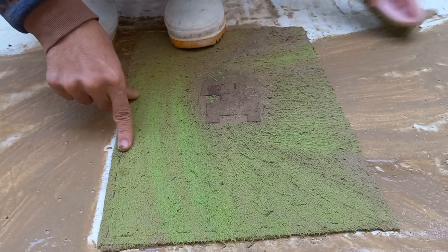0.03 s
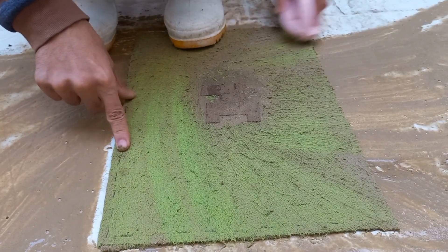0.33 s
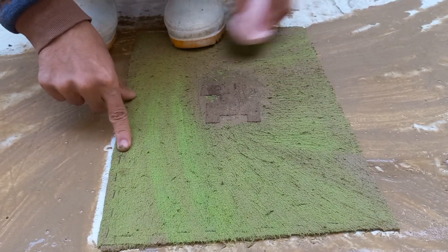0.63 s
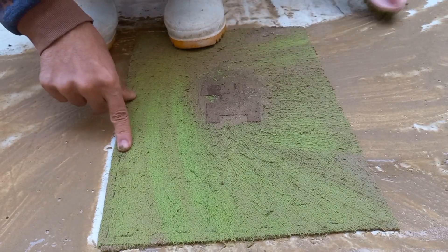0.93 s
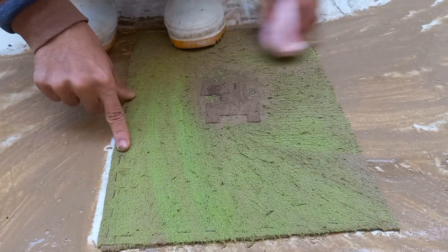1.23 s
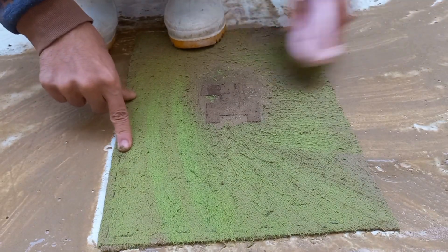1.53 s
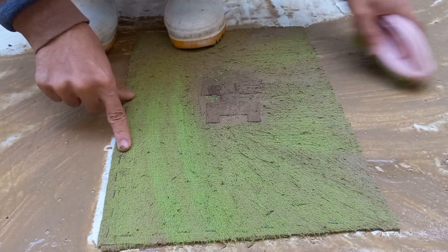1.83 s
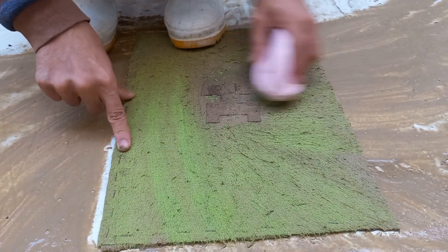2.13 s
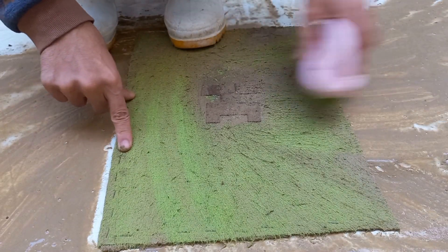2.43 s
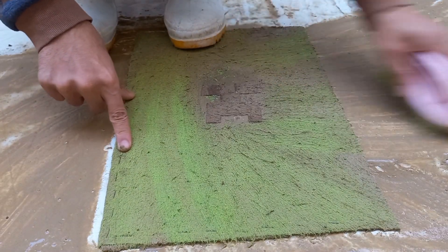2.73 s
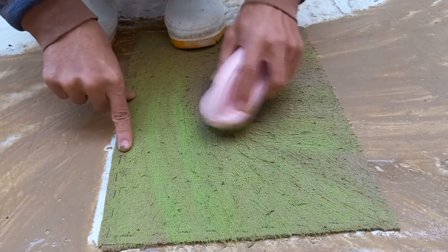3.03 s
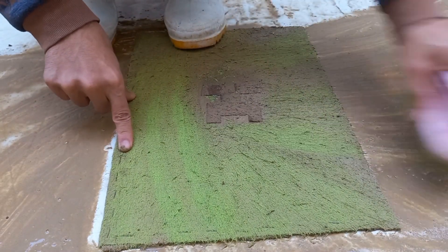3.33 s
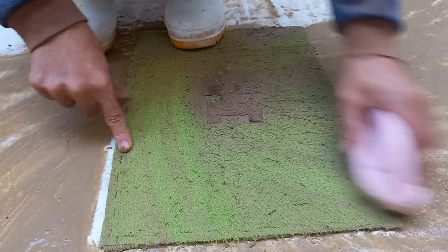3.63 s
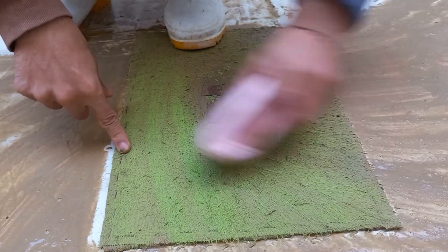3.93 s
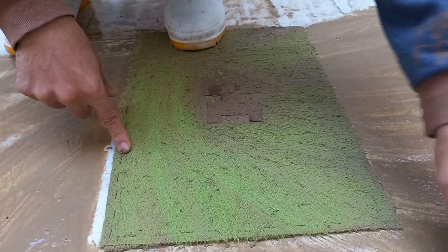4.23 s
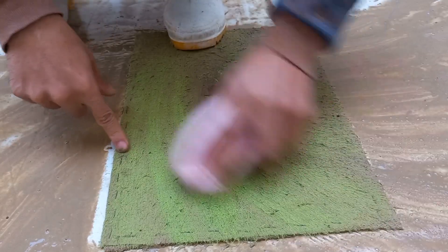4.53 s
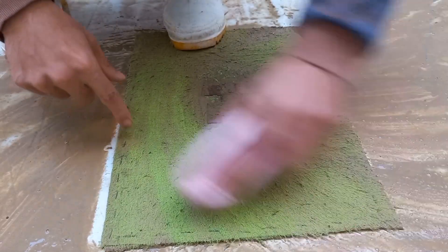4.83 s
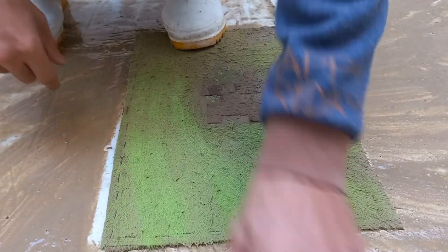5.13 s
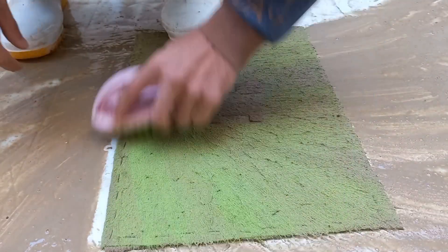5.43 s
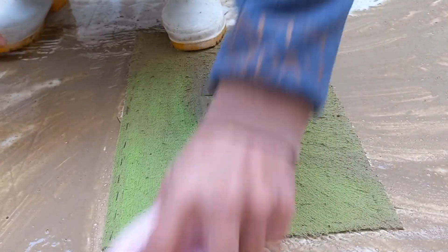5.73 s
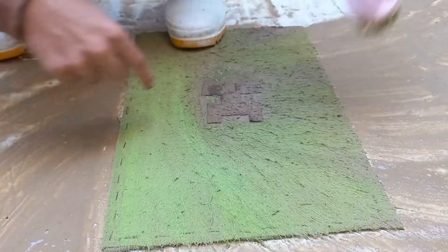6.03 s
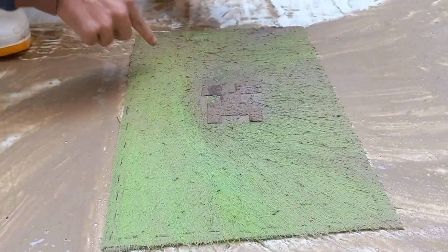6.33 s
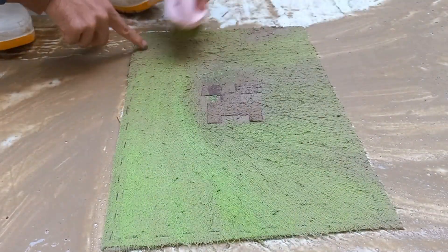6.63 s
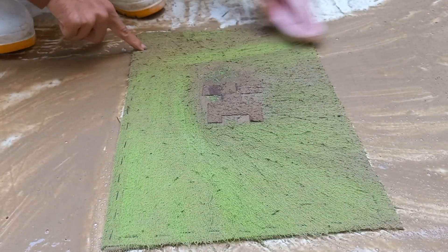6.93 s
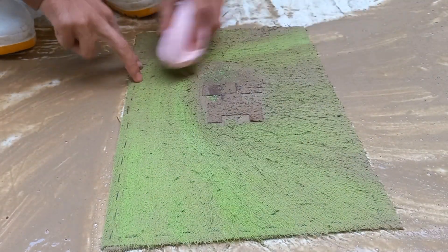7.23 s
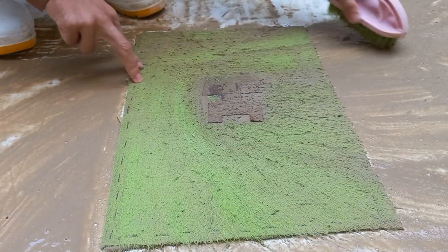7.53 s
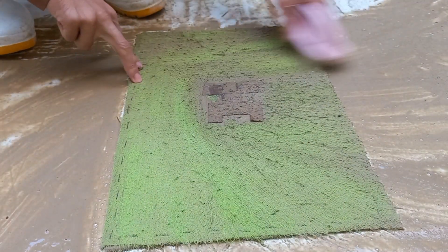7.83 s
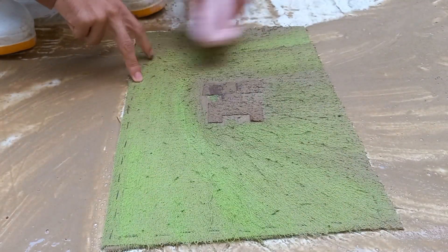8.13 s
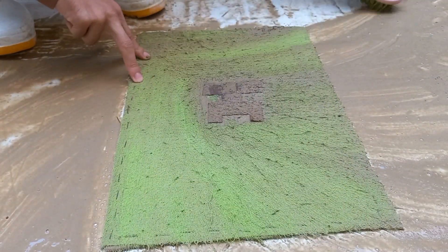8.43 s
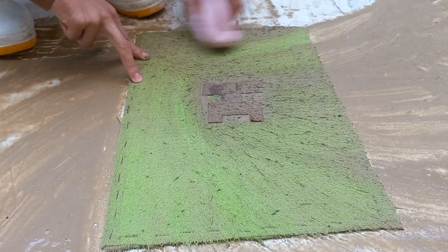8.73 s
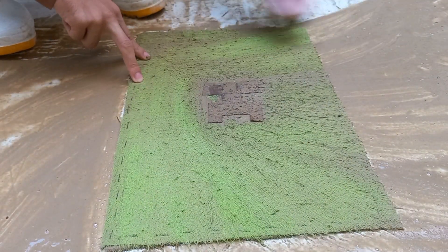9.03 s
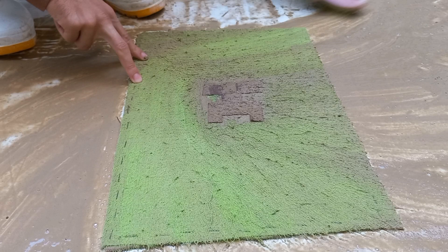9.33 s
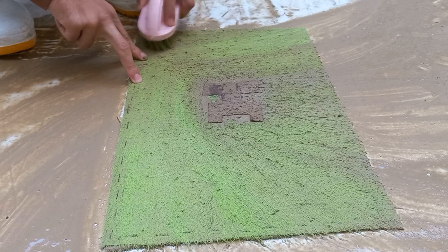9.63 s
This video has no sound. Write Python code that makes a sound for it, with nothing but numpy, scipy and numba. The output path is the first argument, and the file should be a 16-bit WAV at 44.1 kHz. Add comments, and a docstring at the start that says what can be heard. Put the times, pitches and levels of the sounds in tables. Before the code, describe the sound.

Short, bright swishes repeat at an even pace as stiff bristles are pushed across a soaked, muddy carpet, with a gritty rasp and a few flung drops. The strokes grow a little louder, stop for about a second while a boot shuffles and lands with a dull thud, then carry on as before. The stereo microphone is close, in a small hard room with a quiet low rumble.

```python
"""In a small hard room, a stiff hand brush sweeps again and again across a wet, muddy rug on the floor.
Friction is a train of tiny impulses: tips hiss through the pile, bent shafts stick and slip, mud grinds.
Each stroke travels from left to right past a close stereo microphone, and drops tick as damped
resonances. The worker's boots scuff now and then, and in a pause one is set down with a thud.
A low rumble with soft bumps, a hum, a faint drone and airy noise lie underneath."""
import sys
import numpy as np
from scipy import signal
from scipy.fft import rfft, irfft, next_fast_len
from scipy.io import wavfile
from scipy.ndimage import map_coordinates
from numba import njit

SR = 44100
rng = np.random.default_rng(int(sys.argv[2]) if len(sys.argv) > 2 else 0)


def file_out(sig):
    """Save sig as 16-bit WAV at sys.argv[1]."""
    # one column per channel
    cols = np.atleast_2d(sig).T
    # limit, then scale
    lim = np.clip(cols, -1, 1)
    pcm = np.round(lim * 32767).astype(np.int16)
    wavfile.write(sys.argv[1], SR, pcm)


N = 426447
TIME = np.arange(N) / SR


def undb(db):
    """Logarithmic level: 20 dB is a tenfold amplitude."""
    return 10 ** (np.asarray(db) / 20)


def unit(x):
    """Normalisation to rms 1."""
    return x / np.sqrt(np.mean(x ** 2) + 1e-18)


def colour(x, spectrum, tilt_db=0):
    """Spectral shaping by (f/Hz, level/dB) points, tilted by tilt_db per octave; rms 1."""
    size = next_fast_len(x.shape[-1])
    octave = np.log2(np.maximum(np.fft.rfftfreq(size, 1 / SR), 1))
    hz, db = np.transpose(spectrum)
    gain = undb(np.interp(octave, np.log2(hz), db) + tilt_db * np.maximum(octave, np.log2(hz[0])))
    return unit(irfft(rfft(x, size) * gain, size)[..., :x.shape[-1]])


@njit
def resonate(x, hz, width_hz):
    """Second-order resonance: a state-variable band-pass with gain 1 at its moving centre."""
    y, band, low = np.empty(len(x)), 0., 0.
    for i in range(len(x)):
        g = np.tan(np.pi * min(hz[i], .45 * SR) / SR)
        damping = width_hz / hz[i]
        v = (band + g * (x[i] - low)) / (1 + g * (g + damping))
        band, low = 2 * v - band, low + 2 * g * v
        y[i] = damping * v
    return y


def resonate_twice(x, hz, width_hz):
    """Two equal resonances in cascade give steeper skirts."""
    centre = np.full(len(x), hz, dtype=float)
    return resonate(resonate(x, centre, float(width_hz)), centre, float(width_hz))


def walk(size, rate):
    """Random modulation: lines joining Gaussian values, rate of them a second."""
    place = np.arange(size) * rate / SR
    knots = rng.standard_normal(int(place[-1]) + 2)
    return np.interp(place, np.arange(len(knots)), knots)


def flicks(size, rate, spread_db):
    """Shot noise: random impulses of scattered strength, rate of them a second; rms 1."""
    strength = undb(spread_db * np.clip(rng.standard_normal(size), -2.5, 2.5))
    return unit((rng.random(size) < rate / SR) * rng.choice([-1, 1], size) * strength)


def ports(x, lag_ms, late_ms=0):
    """Time of arrival: x reaches two microphone ports late_ms later, the left lag_ms after the right."""
    index = np.arange(len(x))
    delays = [(late_ms + side * lag_ms / 2) * SR / 1000 for side in (1, -1)]
    return np.array([map_coordinates(x, [index - delay], order=3) for delay in delays])


def wide_noise(size, side):
    """Partial coherence: stereo noise with a given side-to-mid ratio."""
    common, apart = rng.standard_normal((2, size))
    return np.array([common + side * apart, common - side * apart])


def add(out, start_s, x):
    """Superposition of x on out from start_s; what lies outside the scene is dropped."""
    i = int(start_s * SR)
    x, i = x[..., max(-i, 0):], max(i, 0)
    out[:, i:i + x.shape[-1]] += x[..., :max(N - i, 0)]


# Spectrum of the bristle tips: f/Hz, level/dB
TIP_SPECTRUM = [(1500, -43), (3000, -15), (4700, -3), (6300, -2), (8000, -1), (9800, 0.3), (12500, -1),
                (16000, -3)]

def tip_hiss(size):
    """Shot noise: tips flick through the pile so often that the impulses merge."""
    return colour(flicks(size, rate=5000, spread_db=2.5), TIP_SPECTRUM)


# Spectrum of the slipping shafts: f/Hz, level/dB
SHAFT_SPECTRUM = [(1100, -21.5), (1700, -22), (2100, -1.5), (2500, -2.5), (3300, -2.5), (4500, 1.5),
                  (6000, -2), (10000, -13.5)]

def shaft_rasp(size):
    """Stick-slip friction excites the shafts, whose resonance wanders as they bend."""
    slips = colour(flicks(size, rate=1600, spread_db=0.5), SHAFT_SPECTRUM)
    ring_hz = 3100 * np.exp(0.24 * walk(size, rate=16.1))
    return unit(slips + 2.43 * resonate(slips, ring_hz, width_hz=260.))


# Spectrum of the grinding mud: f/Hz, level/dB
MUD_SPECTRUM = [(650, -33.5), (1100, -2.5), (1450, 3.5), (1750, 9), (2100, 3), (2900, -33)]

def mud_grind(size):
    """Cavity resonance: wet pockets between the bristles ring, rising in pitch as the brush lifts."""
    mud = colour(flicks(size, rate=1300, spread_db=3), MUD_SPECTRUM)
    pocket_hz = np.linspace(1250, 2000, size) * np.exp(0.27 * walk(size, rate=20.1))
    return unit(mud + 1.6 * resonate(mud, pocket_hz, width_hz=170.))


# Spectrum of the rug's backing: f/Hz, level/dB
BACKING_SPECTRUM = [(150, -19), (320, -9), (520, -5.5), (850, -4.5), (1100, -4.5), (1600, -10.5),
                    (3000, -22.5)]

def backing_drag(size):
    """Forced vibration: random tugs draw a dull noise from the backing."""
    return colour(flicks(size, rate=1000, spread_db=4), BACKING_SPECTRUM)


def tuft(hiss_db, rasp_db, grind_db, drag_db):
    """Common modulation: four friction noises waver together as one tuft snags and lets go."""
    size = len(hiss_db)
    friction = (undb(hiss_db) * tip_hiss(size) + undb(rasp_db - 0.86) * shaft_rasp(size)
                + undb(grind_db) * mud_grind(size) + undb(drag_db) * backing_drag(size))
    return undb(0.73 * walk(size, rate=66.6)) * friction


LIFT_S = 0.14  # lifting off fades a stroke by 60 dB in this time

def stroke_levels(t, settle_s, press_s, fast_s, lift_s, hiss_db, rasp_db, grind_db, drag_db, surge_db):
    """Friction noise grows with load and speed: four levels in dB, t seconds after landing."""
    first_touch = 12 * np.minimum(t / settle_s, 0)  # a few bristles arrive before the rest
    settling = -19 * np.exp(-np.maximum(t / settle_s, 0))
    lifting = -60 * (np.maximum(t - lift_s, 0) / LIFT_S) ** 1.24
    uneven_pile = 1.33 * walk(len(t), rate=30.3)
    uneven_mud = 3.5 * walk(len(t), rate=43.4)
    contact = first_touch + settling + lifting + uneven_pile
    push = np.exp(-((t - press_s) / 0.049) ** 2)
    surge = surge_db * np.exp(-((t - fast_s) / 0.029) ** 2)
    backing_release = -155 * np.maximum(t - press_s, 0)
    return (contact + hiss_db + surge,
            contact + rasp_db + 4 * push + 0.46 * surge,
            contact + grind_db + 6 * push + uneven_mud,
            contact + drag_db + 6 * push + uneven_mud + backing_release)


def stroke_lag(t, first_ms, last_ms, travel_s=0.267):
    """Half a cycle of harmonic motion: the lag between the ports follows the hand along its path."""
    progress = (1 - np.cos(np.pi * np.clip(t / travel_s, 0, 1))) / 2
    return first_ms + (last_ms - first_ms) * progress


# The loudest zips of wet bristles, at their peaks: t/s, f/Hz, level/dB
LOUD_ZIPS = [(1.492, 3580, -24.5), (2.891, 3160, -29.5), (3.872, 2480, -29), (4.316, 2350, -20),
             (4.83, 2480, -23), (7.665, 2680, -26.5), (8.075, 3740, -26), (9.511, 3740, -26)]

def zips(t, fastest_s, half_length_s=0.031, octaves_per_s=-2.0):
    """Synchronised stick-slip: bristles briefly slip in step, giving a narrow, falling band."""
    out = np.zeros(len(t))
    when, high = np.clip(rng.standard_normal(2), -2, 2)
    faint_zip = (fastest_s + 0.031 * when, 2800 * 2 ** (0.3 * high), -30.5)  # one in every stroke
    for s, hz, db in [*LOUD_ZIPS, faint_zip]:
        if t[0] < s < t[-1]:
            pitch = hz * 2 ** (octaves_per_s * (t - s))
            ring = resonate_twice(flicks(len(t), rate=4000, spread_db=2), pitch, width_hz=480)
            out += undb(db) * np.exp(-((t - s) / half_length_s) ** 2) * unit(ring)
    return out


def brush_body(sound, t, fast_s, hollow_depth=0.38, ridge_db=-11, sing_db=-5):
    """Antiresonance and resonance: the gap to the rug cuts a climbing hollow; the bristle row sings."""
    hollow_hz = 970 * 2 ** (7.7 * (t - fast_s))
    sing_hz = 4200 * np.exp(0.3 * walk(len(t), rate=17.8))
    grown = np.clip(t / fast_s, 0, 1) ** 2
    return np.array([x - grown * hollow_depth * resonate(x, hollow_hz, width_hz=790.)
                     + grown * undb(ridge_db) * resonate(x, hollow_hz + 844, width_hz=400.)
                     + undb(sing_db) * resonate(x, sing_hz, width_hz=280.) for x in sound])


# Hand position, as the lag of the left port: t/s, lag at stroke start/ms, lag at stroke end/ms
HAND_PATH = [(0, -0.067, 0.15), (1, -0.057, 0.12), (3.2, -.087, 0.28), (4.202, -0.12, 0.23),
             (4.7, -0.14, .17), (5.15, -.18, -0.034), (5.6, -0.19, -0.16), (7, -0.14, 0.12),
             (7.95, -0.099, 0.16), (9.4, -.12, 0.13)]
# Strokes: landing t/s, settling time constant/s; from landing, hardest push t/s, top speed t/s, lift t/s;
# base level/dB of hiss, rasp, grind and drag; hiss surge at top speed/dB
BRUSH_STROKES = [(-0.035, 0.013, 0.1, 0.13, 0.19, -24.5, -28.5, -44, -46.5, 3.3),
                 (0.414, 0.016, 0.13, 0.14, 0.2, -27.0, -30, -44, -45, 4),
                 (0.879, 0.011, 0.092, 0.1, 0.19, -25.0, -29, -41.5, -43.5, 4.5),
                 (1.351, 0.018, 0.088, 0.13, 0.18, -23.5, -27.0, -42, -44.5, 5.3),
                 (1.839, 0.014, 0.1, 0.14, 0.19, -26, -28.5, -45.5, -45.5, 8),
                 (2.286, 0.014, 0.084, 0.14, 0.17, -24, -28, -43.5, -46.5, 7),
                 (2.76, 0.012, 0.088, 0.15, 0.178, -22, -26.0, -40.5, -43.5, 4.6),
                 (3.229, 0.016, 0.064, 0.13, 0.18, -22.0, -23.5, -37.5, -44.0, 3.8),
                 (3.702, 0.012, 0.098, 0.17, 0.21, -22.5, -25.5, -35.0, -44, 4.6),
                 (4.204, 0.015, 0.11, 0.12, 0.19, -21.0, -24.5, -34.5, -43.5, 2.4),
                 (4.681, 0.022, 0.1, 0.13, 0.17, -19.5, -23, -32, -41.5, 1.9),
                 (5.149, 0.012, 0.1, 0.15, 0.187, -22.0, -25.5, -35.5, -42, 3),
                 (5.615, 0.012, 0.092, 0.13, 0.18, -19, -25, -39.5, -41.5, 1.2),
                 (7.018, 0.023, 0.12, 0.15, 0.18, -20.5, -22.5, -37.5, -39.5, 1.1),
                 (7.491, 0.026, 0.12, 0.16, 0.2, -22.5, -25, -42, -43, 3.6),
                 (7.945, 0.023, 0.069, 0.11, 0.17, -20, -25.5, -40.5, -40.5, 2.7),
                 (8.428, 0.017, 0.11, 0.13, 0.19, -22.0, -25.0, -40.5, -42.0, 1.9),
                 (8.908, 0.016, 0.096, 0.14, 0.18, -23.5, -26, -42.5, -47.5, 4.1),
                 (9.372, 0.015, 0.1, 0.145, 0.19, -23.5, -26.5, -42.0, -49.5, 7.3)]

def brush(tufts=4, end_delay_ms=0.11, bounce_db=-4, lead_s=0.04):
    """A moving line source: tufts interfere with their reflections off hand, arm and floor."""
    out = np.zeros((2, N))
    when, *ends = np.transpose(HAND_PATH)
    for s, settle_s, press_s, fast_s, lift_s, *levels in BRUSH_STROKES:
        t = np.arange(-lead_s, lift_s + LIFT_S, 1 / SR)
        envelopes_db = stroke_levels(t, settle_s, press_s, fast_s, lift_s, *levels)
        lag_ms = stroke_lag(t, *(np.interp(s, when, end) for end in ends))
        sound = ports(zips(s + t, s + fast_s), lag_ms)
        for place in np.linspace(-1, 1, tufts):
            source = tuft(*envelopes_db) / np.sqrt(tufts)
            # the detour changes as the arm moves, sweeping a comb filter
            detour_ms = np.linspace(*rng.uniform(0.501, 2.2, 2), len(t))
            bounce = ports(source, lag_ms + 0.18 * place, detour_ms)
            sound += ports(source, lag_ms + end_delay_ms * place ** 3) + undb(bounce_db) * bounce
        add(out, s - lead_s, brush_body(sound, t, fast_s))
    return out


# Spectrum of the background noise: f/Hz, level/dB
AMBIENT_SPECTRUM = [(15, -33), (25, -25), (48, -17.5), (62, -5.5), (90, -1.5), (140, -4), (175, -12.5),
                    (240, -17), (320, -16.5), (480, -16.5), (800, -23.5), (1300, -27.5), (3000, -34),
                    (6500, -37), (16000, -38)]
# Swell of the rumble: t/s, relative level/dB
RUMBLE_SWELL = [(0.0, -26.5), (0.08, -23), (0.21, -40), (3.01, -42.5), (5.47, -42.5), (5.55, -36.5),
                (5.66, -43.5), (5.74, -37.5), (6.14, -44), (6.19, -33), (6.25, -46), (6.54, -34.5),
                (6.89, -46.5), (7.19, -27.5), (7.43, -42.5), (7.94, -37.5), (8.08, -41.5), (9.67, -46)]

def rumble_and_air(split_hz=230, air_db=-51):
    """Amplitude-modulated noise: a rumble swells below the crossover and air wavers above it."""
    lows, highs = (signal.butter(4, split_hz, kind, fs=SR, output="sos") for kind in ("low", "high"))
    rumble = signal.sosfilt(lows, colour(wide_noise(N, side=0.8), AMBIENT_SPECTRUM))
    air = signal.sosfilt(highs, colour(wide_noise(N, side=0.86), AMBIENT_SPECTRUM))
    rumble_db = np.interp(TIME, *np.transpose(RUMBLE_SWELL)) + 2 + 3 * walk(N, rate=12)
    return unit(rumble) * undb(rumble_db) + unit(air) * undb(air_db + 2.1 * walk(N, rate=7))


# Envelope of the drone: t/s, level/dB
DRONE_LEVELS = [(0, -57), (2, -52.5), (2.8, -50.5), (4, -49), (4.6, -54.5), (7.001, -62.5), (9.67, -54.5)]

def drone():
    """Coloured noise: a spectral peak near 290 Hz is heard as a faint drone."""
    spectrum = [(200, -36), (290, -4), (335, -9), (430, -13.5), (900, -24.5), (4000, -78)]
    level_db = np.interp(TIME, *np.transpose(DRONE_LEVELS))
    return colour(wide_noise(N, side=0.091), spectrum) * undb(level_db)


# Envelope of the hum: t/s, level/dB
HUM_LEVELS = [(0, -55), (1.7, -51.5), (2.4, -40), (3.4, -42.5), (4.2, -57), (9.67, -55)]

def hum():
    """Narrow-band noise: neighbouring frequencies beat, making an unsteady low hum."""
    band = np.array([resonate_twice(x, hz=141.4, width_hz=28.5) for x in wide_noise(N, side=0.31)])
    return unit(band) * undb(np.interp(TIME, *np.transpose(HUM_LEVELS)))


# Spectrum of a scuffing sole: f/Hz, level/dB
SOLE_SPECTRUM = [(100, -4.5), (300, 17.5), (500, 4.5), (900, -6.5), (1500, -14), (3500, -25.5),
                 (8000, -40.5), (16000, -52)]
# Boots, knees and sleeves shifting: centre t/s, duration/s, level/dB, tilt/(dB per octave)
SCUFFS = [(0.07, 0.17, -29, -18), (0.715, 0.13, -61, 5), (0.837, 0.15, -48, 6), (3.965, 0.15, -34, 5.5),
          (4.028, 0.16, -42, 6), (5.874, 0.17, -37.5, 4), (6.19, 0.19, -36.5, 6.5), (6.252, .28, -43, 6.5),
          (6.449, 0.55, -53.5, 6.5), (6.695, 0.047, -35, 1), (6.697, 0.22, -54, 11.5),
          (7.283, 0.25, -43, -9)]

def scuffs():
    """Sliding friction: rubber soles rub over grit and water in short swells of noise."""
    out = np.zeros((2, N))
    for s, length_s, db, tilt_db in SCUFFS:
        size = int(length_s * SR)
        grit = 0.5 * flicks(size, rate=2000, spread_db=3) + wide_noise(size, side=0.7)
        grit *= undb(1.8 * walk(size, rate=45))
        add(out, s - length_s / 2, undb(db) * np.hanning(size) * colour(grit, SOLE_SPECTRUM, tilt_db))
    return out


def splash(db, hz, width_hz, t60):
    """Exponential decay of a noise band; higher splashes differ more between the ports."""
    t = TIME[:SR // 6]
    spray = wide_noise(len(t), side=min(hz / 4000, 1))
    burst = np.array([resonate_twice(x, hz, width_hz) for x in spray])
    rise = np.minimum(t / (0.056 * t60), 1)  # longer splashes also start more slowly
    return unit(burst) * rise * undb(db - 60 * t / t60)


# Wet bristles touching the rug just before a stroke: t/s, level/dB
BRISTLE_TOUCHES = [(.390, -37.5), (.838, -39), (1.331, -37), (1.826, -43), (2.271, -44), (4.178, -39),
                   (4.642, -34.5), (5.127, -38.5), (5.596, -29.5), (7.451, -25.5), (7.907, -31.5),
                   (8.393, -38), (9.345, -37)]
# Flung drops and small splashes: t/s, level/dB, f/Hz, bandwidth/Hz, T60/s
FLUNG_DROPS = [(.389, -37.5, 1262, 900, 0.039), (0.77, -31.5, 1850, 1200, 0.11),
               (0.773, -36, 2830, 2600, 0.018), (1.334, -34, 640, 400, 0.091),
               (5.596, -23.5, 1390, 900, 0.031), (6.093, -31, 3260, 1810, 0.075),
               (6.61, -22, 12100, 7140, 0.023), (7.4454, -18, 7140, 14000, 0.019),
               (8.8034, -41, 4490, 5000, 0.024), (9.262, -41, 6500, 2500, .028)]

def wet_ticks():
    """Impact noise: bristles touch down in broadband ticks, drops land in narrower ones."""
    out = np.zeros((2, N))
    for s, db in BRISTLE_TOUCHES:
        add(out, s, splash(db, hz=8000, width_hz=33000, t60=0.08))
    for s, *drop in FLUNG_DROPS:
        add(out, s, splash(*drop))
    return out


# Soft bumps in the rumble: centre t/s, level/dB
LOW_BUMPS = [(0.431, -29), (1.16, -32.5), (1.53, -34), (1.64, -33.5), (1.78, -33), (2.26, -36), (7.35, -30),
             (7.51, -34), (7.89, -30)]

def bumps(centre_hz=87, scatter_octaves=0.23, half_length_s=0.015):
    """Wave packets: each bump is a few cycles of a low tone under a Gaussian envelope."""
    out = np.zeros((2, N))
    t = TIME[:int(6 * half_length_s * SR)] - 3 * half_length_s
    for s, db in LOW_BUMPS:
        hz = centre_hz * 2 ** (scatter_octaves * rng.uniform(-1, 1))
        tone = np.sqrt(2) * np.sin(2 * np.pi * hz * t + rng.uniform(0, np.pi, (2, 1)))
        add(out, s + t[0], undb(db) * np.exp(-(t / half_length_s) ** 2) * tone)
    return out


# Modes of the boot's thud: f/Hz, relative level/dB, T60/s
BOOT_MODES = [(208.6, 0.5, 0.19), (290, 3.5, 0.09), (402, -9, 0.083), (517, -10, .07), (756, -22, 0.081),
              (1170, -20, .04), (1550, -23, .04)]
# Contacts of the boot with the floor: t/s, level/dB
BOOT_CONTACTS = [(6.68, -32), (6.693, -28.5)]

def boot_thud():
    """Damped free vibration: setting a boot down excites low modes that soon die away."""
    out = np.zeros((2, N))
    t = TIME[:SR // 3]
    thud = sum(undb(db - 60 * t / t60) * np.sin(2 * np.pi * hz * t) for hz, db, t60 in BOOT_MODES)
    for s, db in BOOT_CONTACTS:
        add(out, s, undb(db) * thud)
    return out


# Reverberation by band: lower f/Hz, upper f/Hz, T60/s, level/dB
ROOM_BANDS = [(100, 1200, 0.49, -22.5), (1400, 2760, 0.4, -23), (2560, 5500, 0.34, -22.5),
              (5970, 16600, 0.23, -15)]

def room(direct, gap_s=0.006):
    """Reverberation: the diffuse tail of a small hard room decays fastest in the treble."""
    t = TIME[:int(0.7 * SR)]
    response = np.zeros((2, len(t)))
    for low_hz, high_hz, t60, db in ROOM_BANDS:
        band = signal.butter(3, [low_hz, high_hz], "band", fs=SR, output="sos")
        noise = signal.sosfilt(band, rng.standard_normal((2, len(t))))
        tail = noise * undb(-60 * t / t60) * (t > gap_s)
        response += undb(db) * unit(tail) / np.sqrt(len(t))
    return direct + signal.fftconvolve(direct, response, axes=1)[:, :N]


def scene():
    """Superposition: brush, ticks and boots reverberate in the room, over the low background."""
    work = brush() + wet_ticks() + scuffs() + boot_thud()
    return room(work) + rumble_and_air() + drone() + hum() + bumps()


def record(dry, cutoff_hz=15850):
    """Band limiting: an elliptic low-pass cuts the top steeply."""
    return signal.sosfilt(signal.ellip(10, 0.2, 80, cutoff_hz, fs=SR, output="sos"), dry)


dry = scene()
out = record(dry)
file_out(out)
```